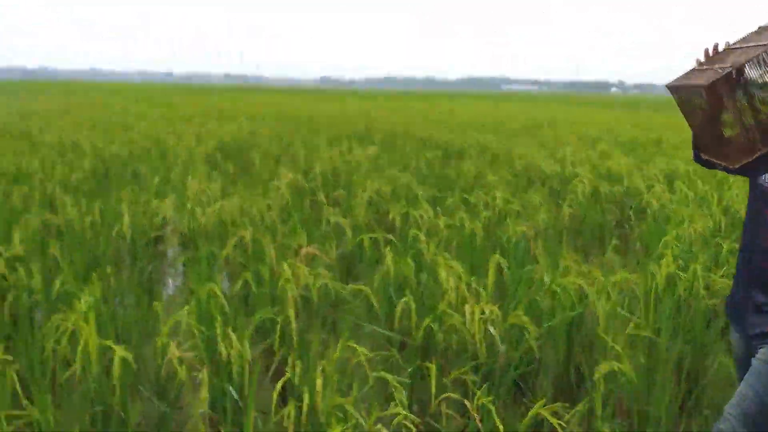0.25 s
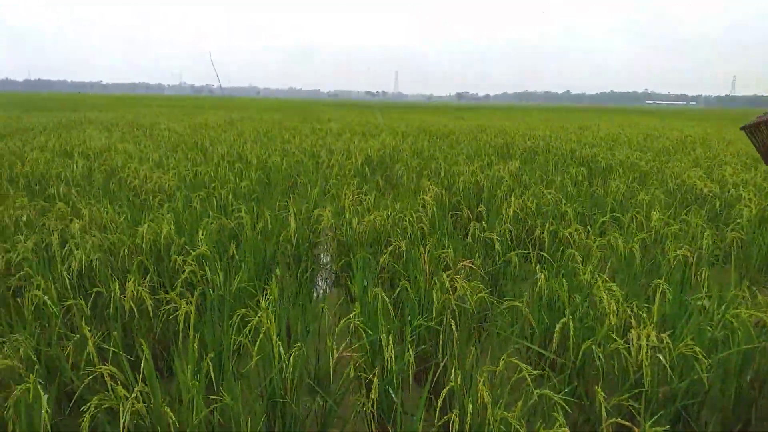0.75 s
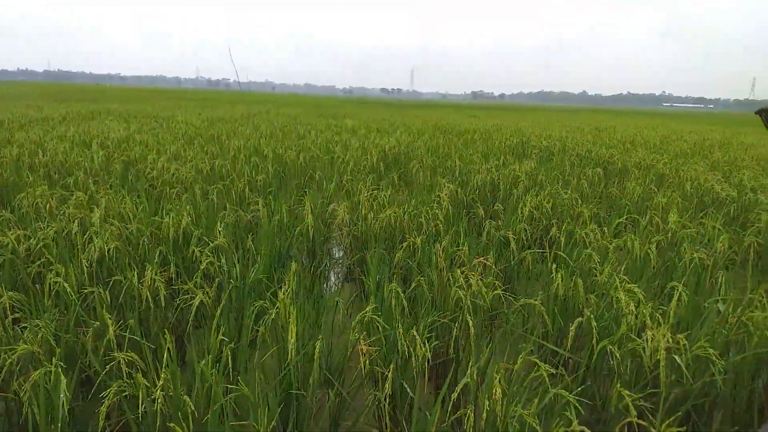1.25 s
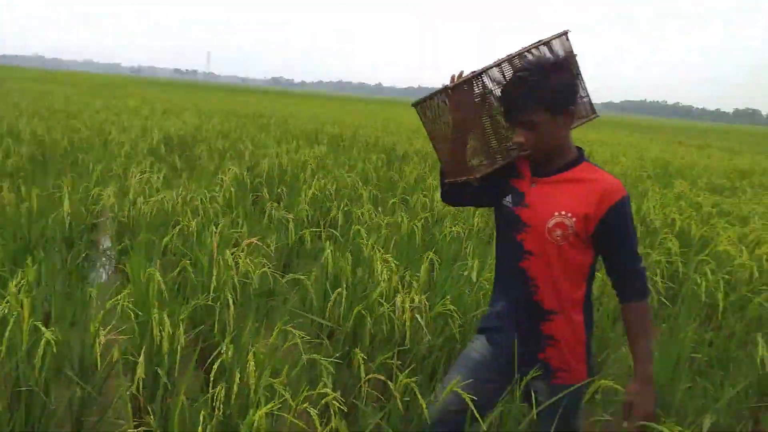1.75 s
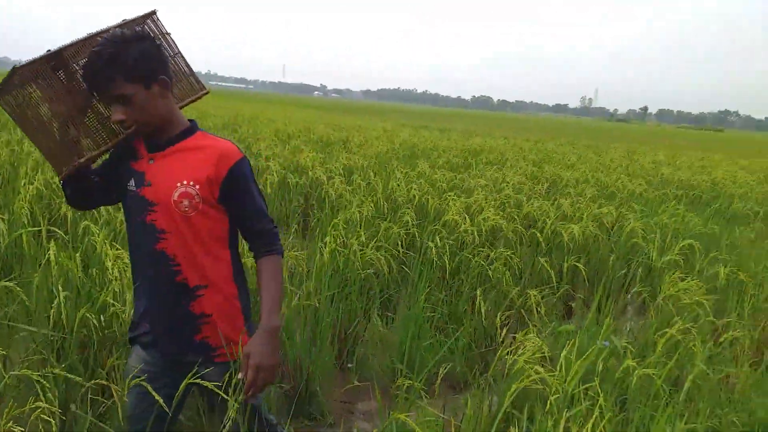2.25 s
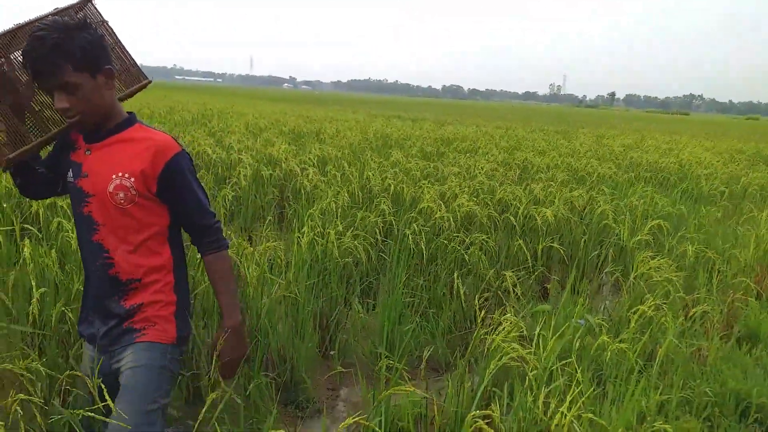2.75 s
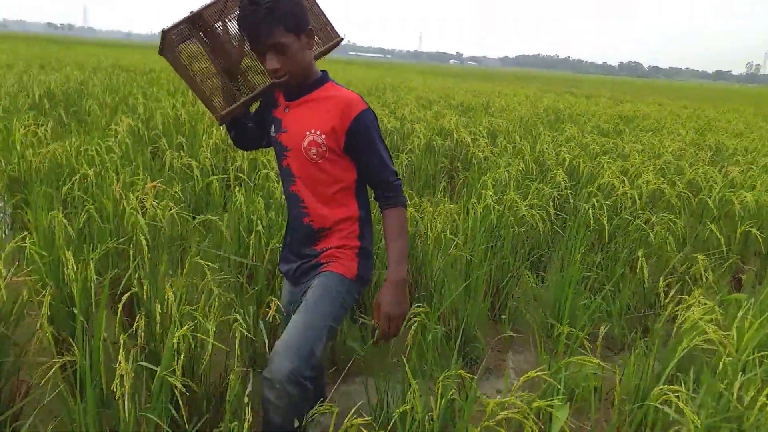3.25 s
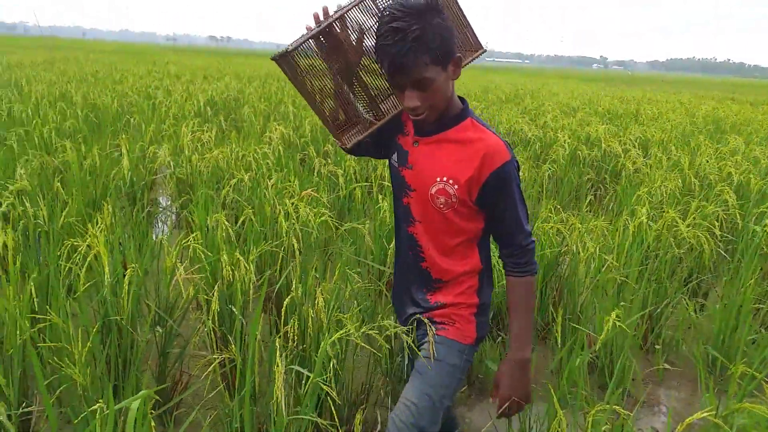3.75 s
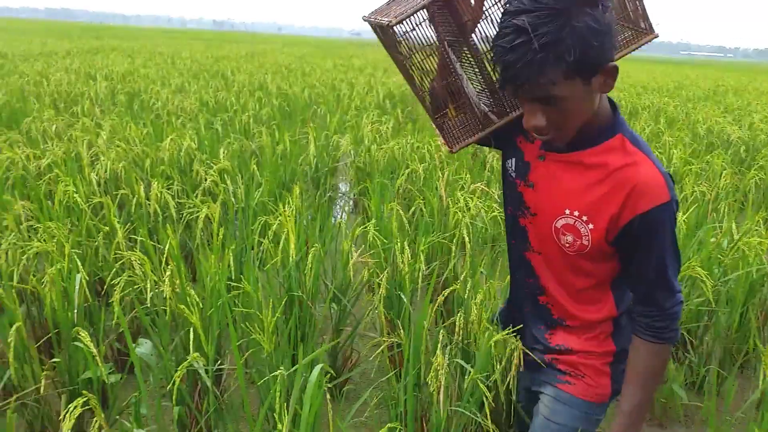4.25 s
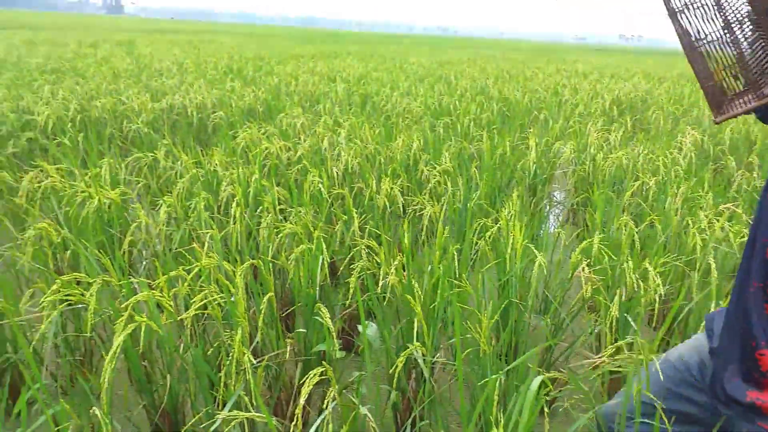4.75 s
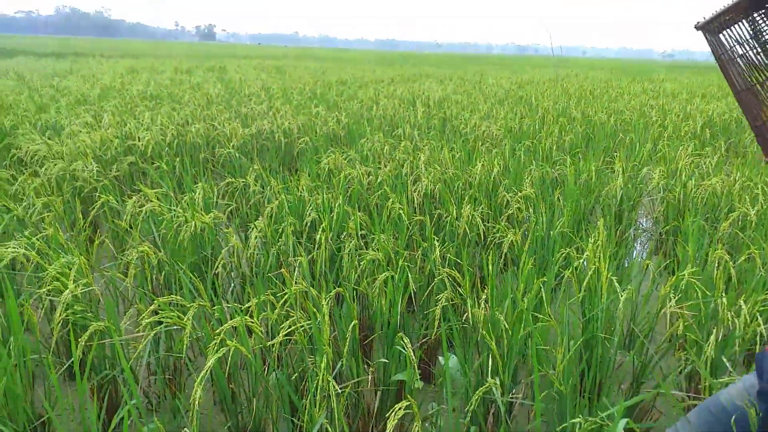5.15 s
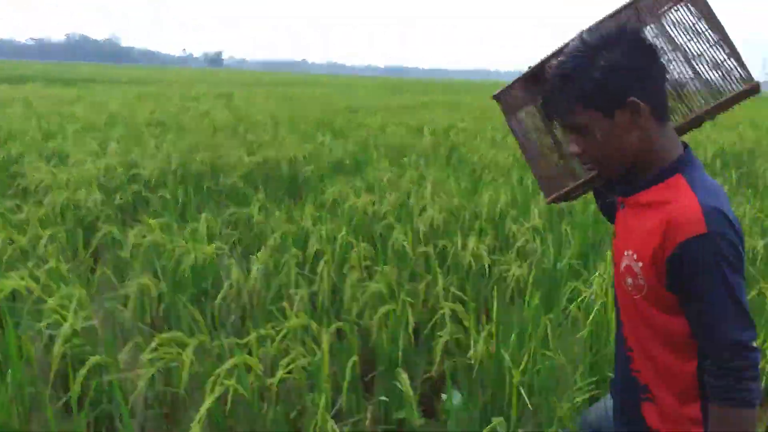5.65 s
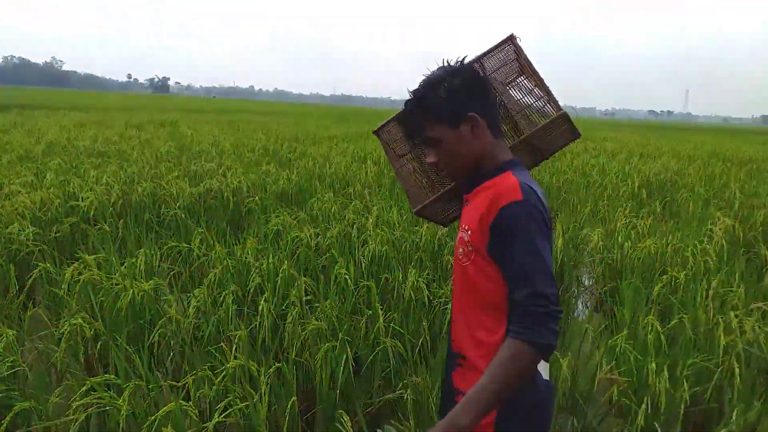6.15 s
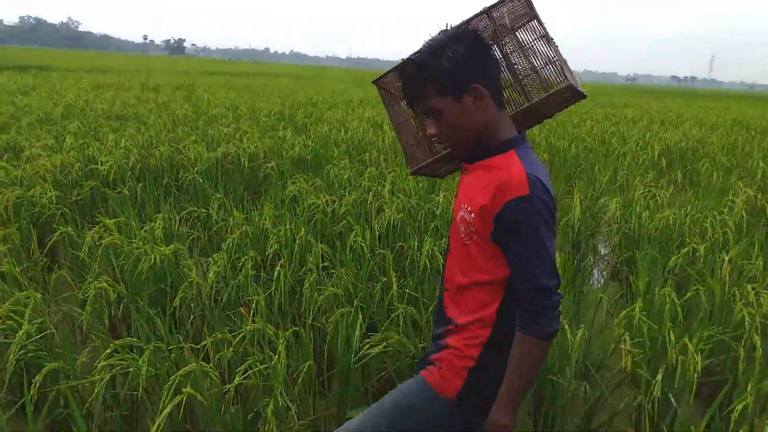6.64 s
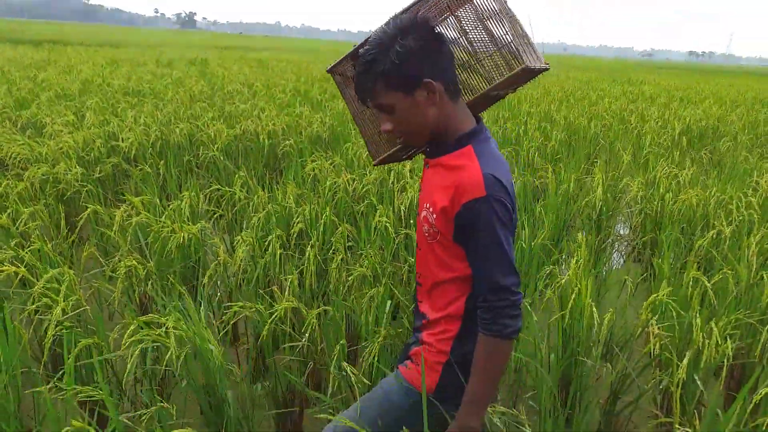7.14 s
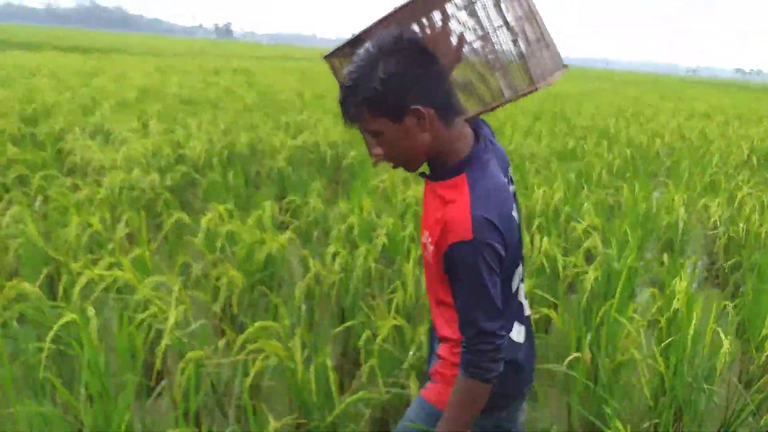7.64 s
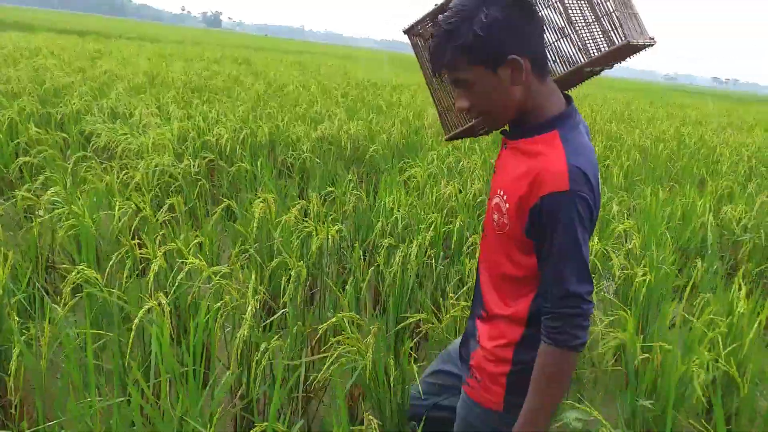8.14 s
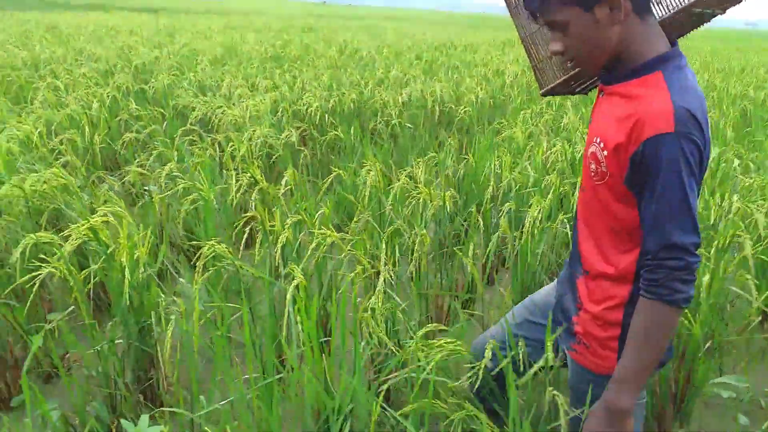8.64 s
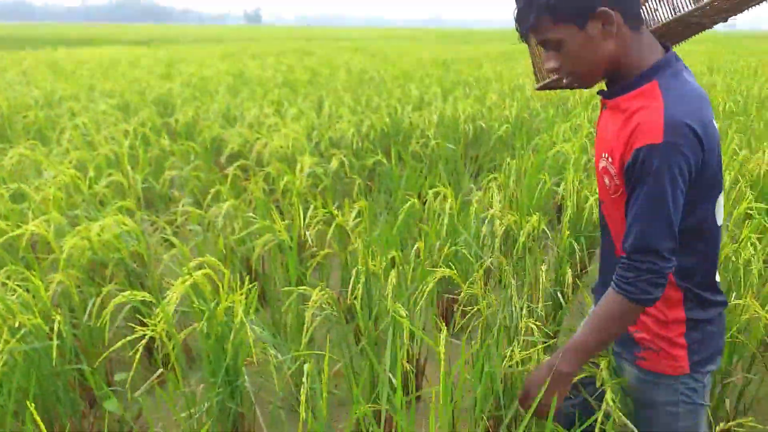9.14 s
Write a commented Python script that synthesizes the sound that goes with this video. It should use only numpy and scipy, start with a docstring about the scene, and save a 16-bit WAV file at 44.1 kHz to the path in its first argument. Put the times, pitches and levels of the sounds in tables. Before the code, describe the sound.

Outdoors in a flooded rice field, close microphone, no echo. From 0 to 0.6 s heavy low wind flutters and thumps on the microphone over soft sloshing and leaf hiss; gusts weaken until about 2 s, with sharp wet snaps at 0.9 to 1.7 s. A faint high cricket pulses quickly from 0.5 to 2.2 s among thin insect hiss. Around 2.5 to 3 s a stride gives rising squelches, small bubbles and clicks. It calms near 4 s. From 4.5 to 5.5 s come dense splashes, cracking slaps, plops and leaf flicks. Leaves swish brightly at 6 to 7 s, with low bubbles and a thump at 6.9 s. After a quieter rustle, bubbly plops and sharp slaps cluster at 8 to 8.3 s. Wind buffets strongly from 8.5 s, heaviest just after 9 s, with a last wet plop at the end. A far bird's brief falling whistle recurs faintly.

```python
"""Wading through a flooded rice field

Close by, each stride sloshes, throws drops and traps bubbles: shaped click trains and gliding, ringing tones.
The legs brush the leaves, a dense bright hiss of tiny catches with snaps and flicks.
Insects shrill all around in narrow bands of noise, and a far bird repeats a falling whistle.
Gusts of noise and low thumps of eddies buffet the microphone at the start and again near the end."""
import sys
import numpy as np
from scipy import signal
from scipy.fft import rfft, irfft, next_fast_len
from scipy.io import wavfile
from scipy.ndimage import uniform_filter1d

SR = 44100
rng = np.random.default_rng(int(sys.argv[2]) if len(sys.argv) > 2 else 0)


def materialize(psi):
    """Save the field psi as 16-bit PCM at rate SR to the path in sys.argv[1].

    A 1-D psi becomes a single channel; in a 2-D psi each row is a channel.
    """
    bounded = np.clip(np.atleast_2d(psi).T, -1, 1)
    quanta = np.round(bounded * 32767).astype(np.int16)
    wavfile.write(sys.argv[1], SR, quanta)


N = 414099
TIME = np.arange(N) / SR   # seconds

# Spectra, each scaled to a set level later. Each row: frequency in Hz, relative density in dB per Hz.
# Open air over the field.
FIELD_SPECTRUM = [(30, -8), (70, 12), (130, 14), (250, 8), (450, -8), (900, -10.5), (1700, -13.5),
                  (2400, -6.5), (3200, -8), (4300, -4.5), (6500, -19.5), (10000, -10.5), (16000, -37)]
# Wind at the microphone, before gust force tilts it.
WIND_SPECTRUM = [(25, -40), (40, -43), (65, 0), (110, 2), (200, -5), (300, -16), (500, -34.5), (900, -64),
                 (2000, -80)]
# Blades sliding over cloth.
LEAF_SPECTRUM = [(500, -50), (1000, -5), (1500, -29), (2100, -15.5), (3300, 1), (5200, 3), (6200, -2.5),
                 (8000, -1), (9300, -10.5), (10100, -6), (11200, 0), (13000, 2.5), (15500, 3.5)]
# Bent stalks crackling.
STALK_SPECTRUM = [(500, -13), (800, 9), (1150, -2), (1500, 5.5), (2100, -5), (3200, -11), (6000, -20)]
# Deep churn around the leg.
CHURN_SPECTRUM = [(150, -17), (260, -2.5), (350, 5), (480, -6.5), (700, -1), (1050, -2.5), (1500, -19),
                  (3000, -36)]
# Splatter of the slosh.
SLOSH_SPECTRUM = [(250, -36), (480, -8), (620, -4), (950, 2), (1250, -3.5), (1550, -2), (2200, -2),
                  (3200, -3), (7000, -14)]
# Fine flung spray.
SPRAY_SPECTRUM = [(1500, -4), (2600, -14.5), (3600, 5), (5200, 0.5), (7000, -1), (10000, -28), (16000, -38)]
# Falling drops.
PATTER_SPECTRUM = [(400, -25), (650, -2.5), (1000, 0.5), (1400, -5), (2000, -4), (2700, -3.5), (3700, 2),
                   (5500, -2.5), (8000, -15), (15000, -30)]

# Insect choruses all around. Each row: time in seconds, high chorus level in dB, low chorus level in dB.
INSECT_LEVELS = [(0, -62, -71), (1.3, -58.5, -57), (1.7, -53.5, -66), (2.2, -62, -63), (4.2, -60.5, -66),
                 (5, -68, -52), (7.7, -69, -53.5), (8.3, -51, -60.5), (9.39, -56, -49.5)]
# Far bird whistles. Each row: start in seconds, level in dB before the flutter, starting pitch in Hz.
BIRD_WHISTLES = [(.72, -46, 4700), (2.43, -50, 4000), (3.14, -57, 3700), (3.86, -56, 4600),
                 (5.51, -56, 3900), (6.79, -52, 4300), (7.09, -48, 4500), (8.75, -54, 3900)]
# Gusts on the microphone. Each row: start in seconds, hold in seconds, level in dB before lumps and trim.
WIND_GUSTS = [(0.0, 0.17, -16.5), (0.27, .15, -20), (0.54, 0.23, -19.5), (0.92, 0.02, -26),
              (1.05, 0.028, -29.5), (1.15, .04, -27), (1.28, 0.11, -26), (1.44, 0.072, -27),
              (1.58, 0.27, -30), (1.94, .09, -29), (2.26, 0.035, -38), (2.47, 0.19, -36),
              (2.91, 0.034, -40), (3.02, 0.028, -32), (3.13, 0.063, -35), (3.26, .76, -44),
              (4.15, 0.35, -50), (6.93, 0.043, -36.5), (7.68, .08, -32), (7.78, 0.45, -32),
              (8.39, 0.11, -28), (8.5, 0.064, -22), (8.76, 0.24, -23.5), (9.03, 0.32, -18.5)]
# Strong eddies hitting the microphone port. Each row: middle in seconds, level in dB before a trim,
# pitch at the middle in Hz.
PORT_EDDIES = [(0.074, -12, 166), (0.164, -11.5, 203), (0.278, -13, 167), (0.33, -15, 128),
               (0.377, -2, 200), (0.398, -6, 187), (0.41, -4, 176), (0.501, -9.5, 191), (0.534, -10, 201),
               (0.819, -9.5, 195), (1.298, -12, 184), (1.333, -12, 122), (1.382, -15.5, 145),
               (1.51, -14, 121), (1.804, -16.5, 102), (1.948, -17.5, 152), (2.625, -22, 99),
               (3.033, -22.5, 105), (3.137, -17.5, 134), (6.933, -8.5, 128), (7.784, -15.5, 168),
               (7.824, -11.5, 90), (7.934, -13, 190), (8.522, -6.5, 135), (8.565, -7.5, 174),
               (8.753, -14.5, 137), (8.779, -13, 118), (8.857, -8.5, 131), (8.954, -9.5, 141),
               (9.01, -17, 260), (9.039, -3.5, 149), (9.062, -5.5, 192), (9.096, -6, 260), (9.114, -5, 205),
               (9.17, -10, 161), (9.227, -6.5, 172), (9.288, -15, 173)]
# A leg sweeps through a clump of leaves. Each row: start in seconds, hold in seconds, level in dB before trims.
LEAF_BRUSHES = [(0.0, 0.52, -52.5), (2.43, 0.062, -47), (2.94, 0.092, -48), (3.3, 0.77, -53),
                (4.36, 0.3, -43.5), (4.8, 0.15, -48), (5.98, 0.22, -40.5), (6.39, 0.33, -37.5),
                (6.88, 0.097, -42.5), (7.3, .7, -46), (8.3, 0.39, -41), (8.8, 0.29, -45), (9.22, .17, -44)]
# Dry blades flicking free. Each row: start in seconds, peak in dB.
BLADE_FLICKS = [(2.786, -29), (4.5875, -29), (4.6344, -29), (4.9781, -27), (5.043, -24), (5.2939, -32),
                (6.8748, -25), (7.5383, -35)]
# Sharp slaps of water and snapping stalks. Each row: start in seconds, level in dB before a trim,
# crack centre in Hz, low plash in dB relative to the crack.
WATER_SLAPS = [(0.175, -27, 3870, -6), (0.787, -35, 3960, -12), (0.8808, -19, 3680, -31),
               (0.9947, -26, 3720, -6), (1.1064, -29, 6140, -21), (1.3743, -26.5, 4940, -17),
               (1.556, -24, 3170, -20), (1.6659, -27, 1830, -19), (2.5855, -31, 3620, -1),
               (2.6585, -23, 3380, -15), (2.8429, -33, 5610, -7), (2.9878, -25, 4200, -16),
               (3.469, -27.5, 2100, -15), (4.5411, -22.5, 3300, -7), (4.6352, -21.5, 6580, -24),
               (4.6577, -24, 1770, -6), (4.6815, -18.5, 3460, -13), (4.702, -17.5, 3360, -9),
               (4.8098, -22, 3660, -16), (5.047, -18, 5210, -6), (5.087, -19, 2700, 3),
               (5.141, -18.5, 3950, -19), (5.217, -18.5, 3800, -16), (5.249, -23, 3640, -22),
               (5.365, -24, 3500, -19), (5.4024, -17, 3100, 2), (5.44, -25.5, 4230, -2),
               (5.753, -25, 4870, -23), (6.3738, -22, 4550, -15), (6.8766, -28, 5320, -2),
               (6.906, -20.5, 4230, -24), (7.933, -23, 4090, -10), (7.9714, -23, 3840, -4),
               (8.0207, -21, 1500, 10), (8.0684, -29, 1670, -6), (8.1095, -22, 3670, -20),
               (8.1868, -24, 2240, -12), (8.2, -20, 2600, -8), (8.3263, -21, 2860, -12),
               (8.6276, -21.5, 3700, -18), (9.103, -22.5, 3470, -9.5), (9.358, -29.5, 2280, -4)]
# Air pockets that open or close around a foot. Each row: start in seconds, length in seconds,
# start pitch in Hz, end pitch in Hz, level in dB before a trim.
FOOT_SQUELCHES = [(1.75, 0.071, 573, 900, -36), (2.531, 0.037, 937, 2290, -29),
                  (2.61, 0.032, 688, 1610, -29.5), (2.665, 0.012, 1410, 2400, -24.5),
                  (2.677, 0.0255, 880, 1280, -36), (2.712, 0.019, 2500, 1460, -31),
                  (2.729, 0.035, 1010, 880, -33), (2.798, 0.047, 794, 906, -33.5),
                  (4.524, 0.0485, 642, 910, -31), (4.993, 0.089, 900, 1050, -51),
                  (5.281, 0.036, 960, 510, -29.5), (6.033, 0.034, 1280, 843, -32),
                  (8.563, 0.033, 1290, 690, -30)]
# Single large bubbles. Each row: start in seconds, level in dB, starting pitch in Hz, 60 dB decay in seconds.
LARGE_BUBBLES = [(0.787, -30.5, 3700, 0.02), (1.471, -29.5, 1900, .019), (1.515, -25, 543, 0.025),
                 (1.555, -21, 3180, 0.018), (1.639, -30.5, 1950, .025), (1.666, -28, 1820, 0.013),
                 (1.746, -33, 1750, .027), (2.586, -32.5, 597, 0.064), (2.586, -26, 3650, .013),
                 (2.661, -24, 3700, .009), (2.715, -28.5, 2210, 0.018), (2.786, -27, 800, .042),
                 (2.82, -28, 3850, .02), (3.39, -38.5, 1780, .027), (3.437, -29, 990, 0.016),
                 (4.541, -29, 3200, 0.038), (4.57, -32, 1790, 0.066), (4.653, -27, 4100, 0.038),
                 (4.658, -27, 1770, .033), (4.658, -18, 1010, .017), (4.684, -22, 900, 0.021),
                 (5.156, -31, 1010, .03), (5.161, -30.5, 550, 0.032), (5.251, -32, 2290, .031),
                 (5.308, -30, 443, 0.027), (5.69, -29, 290, 0.062), (5.757, -37, 285, 0.15),
                 (6.06, -29, 900, .03), (6.071, -36, 260, .19), (6.125, -36, 585, 0.11),
                 (6.869, -27, 650, 0.019), (7.993, -22.5, 520, 0.055), (8.021, -28, 1510, .017),
                 (8.069, -18.5, 900, 0.017), (8.087, -24, 1610, 0.017), (8.11, -19, 3700, .014),
                 (8.187, -19.5, 2200, 0.03), (8.206, -24, 810, 0.029), (8.318, -30, 1180, 0.033),
                 (8.638, -22.5, 1370, 0.03), (9.055, -29, 2440, .024), (9.374, -23.5, 2390, .012)]
# A leg pushes through the water. Each row: start in seconds, hold in seconds, slosh level in dB,
# spray level in dB, deep churn level in dB, all before trims.
LEG_STRIDES = [(0.0, .2, -47.5, -52, -72), (0.818, 0.44, -49, -45, -80), (1.378, .4, -45, -50.5, -66),
               (2.562, 0.26, -43, -48, -59), (2.897, 0.39, -50.5, -46.5, -75),
               (3.39, 0.16, -48.5, -60, -62), (4.458, 0.12, -46.5, -49, -53),
               (4.644, 0.037, -40.5, -36, -52), (4.814, 0.21, -44.5, -44.5, -73),
               (4.96, 0.11, -42, -39.5, -47.5), (5.156, 0.19, -43, -41.5, -46),
               (5.516, 0.39, -55, -42.5, -60), (6.03, .03, -41.5, -40.5, -51),
               (6.14, 0.63, -46.5, -43.5, -66), (6.818, 0.13, -44.5, -44.5, -72),
               (7.864, 0.051, -47, -42, -68), (8.062, 0.032, -34.5, -41, -46),
               (8.187, 0.038, -38, -36.5, -65), (8.343, 0.33, -42, -45, -56),
               (8.705, 0.26, -51.5, -52, -72), (9.337, .06, -36, -41, -66)]

# One near cricket chirps at a steady pace, swelling to its loudest and fading again.
CRICKET_START_S, CHIRP_EVERY_S, CHIRP_HALF_S = .51, .1175, .044
CRICKET_DB, CRICKET_LOUDEST_S, CRICKET_FADE_DB_PER_S = -57, 1.5, 9
GUST_RISE_S, GUST_FALL_S = 0.091, 0.13   # a gust comes, and goes, by 20 dB in these times
BREEZE_DB = -56.5   # between gusts, before lumps and trim
RASP_DB, RASP_DB_PER_OCTAVE = -30.5, 17.5   # rasp of a 160 Hz eddy, relative to its row; faster ones rasp more
BEND_S, SPRING_BACK_S = 0.43, 0.77   # the leaves swell, and fade, by 20 dB in these times
RUSTLE_DB = -55   # leaves that never stop touching, before trims
PUSH_S, SETTLE_S = 0.15, 0.24   # the water rises, and settles again, by 20 dB in these times
TRICKLE_DB, DRIP_DB, CHURN_REST_DB = -57.5, -50.5, -65.5   # the wake between strides, before trims
CUTOFF_HZ = 15750   # top of the microphone's range


def from_db(db):
    """Decibels to gain."""
    return 10 ** (np.asarray(db) / 20)


def rms_one(x):
    """Scale to unit rms."""
    return x / np.sqrt(np.mean(x ** 2) + 1e-20)


def in_time(rows):
    """Each column of a curve table, sample by sample."""
    s, *columns = np.transpose(rows)
    return [np.interp(TIME, s, c) for c in columns]


def at_hz(points, hz):
    """Read a spectrum on a log-frequency axis."""
    table_hz, table_db = np.array(points).T
    return np.interp(np.log(hz + 1e-3), np.log(table_hz), table_db)


def drift(rate):
    """Smooth chance of spread 1, changing about rate times a second."""
    r = np.exp(-40 * np.pi * rate / SR)   # computed at every twentieth sample
    noise = rng.standard_normal(N // 20 + 2002)
    slow = signal.lfilter([1], [1, -2 * r, r * r], noise)[2000:]
    return np.interp(np.arange(N) / 20, np.arange(len(slow)), rms_one(slow))


def coloured(x, spectrum):
    """Give a noise or a click train a spectrum; rms 1."""
    size = next_fast_len(N)
    hz = np.arange(size // 2 + 1) * SR / size
    shaped = irfft(rfft(x, size) * from_db(at_hz(spectrum, hz)), size)
    return rms_one(shaped[:N])


def band_pass(x, low_hz, high_hz):
    """Keep the band between two frequencies."""
    return signal.sosfilt(signal.butter(2, [low_hz, high_hz], "band", fs=SR, output="sos"), x)


def low_pass(x, hz):
    """Soften everything above a frequency."""
    return signal.sosfilt(signal.butter(2, hz, fs=SR, output="sos"), x)


def resonance(x, hz, width_hz):
    """Two-pole resonance, gain about 1 on top."""
    r = np.exp(-np.pi * width_hz / SR)
    feedback = [1, -2 * r * np.cos(2 * np.pi * hz / SR), r * r]
    return signal.lfilter(np.array([1, 0, -1]) * (1 - r * r) / 2, feedback, x)


def grains(per_s, spread_db):
    """Random clicks of either sign, most small and a few large."""
    chance, out = rng.random(N), np.zeros(N)
    size, sign = rng.exponential(1, N), rng.random(N) - .5
    at = chance < per_s / SR
    out[at] = from_db(spread_db * np.minimum(size[at], 4)) * np.sign(sign[at])
    return out


def add(out, s, sound):
    """Mix a short sound in at time s."""
    start = int(np.clip(round(s * SR), 0, N))
    out[start:start + len(sound)] += sound[:N - start]


def swells(rows, rise_s, fall_s, rest_db):
    """Rise, hold and fall for each row (s, hold s, dB), over a resting level; the joint level in dB."""
    t, power = TIME[::50], from_db(rest_db) ** 2
    for s, hold, db in rows:
        outside = np.maximum(s - t, 0) / rise_s + np.maximum(t - s - hold, 0) / fall_s
        power = power + from_db(db - 20 * np.minimum(outside, 10)) ** 2
    return np.interp(TIME, t, 10 * np.log10(power))


def field():
    """Open air: a low far rumble and the soft hiss of the crop."""
    return from_db(-46.5) * coloured(rng.standard_normal(N), FIELD_SPECTRUM)


def shrill(low_hz, high_hz):
    """Insect voices merged into noise in a narrow, steep band; rms 1."""
    return rms_one(band_pass(rng.standard_normal(N), low_hz, high_hz))


def cricket_chirps(count):
    """Loudness of an evenly paced run of short, round chirps."""
    times = CRICKET_START_S + CHIRP_EVERY_S * np.arange(count)
    levels_db = CRICKET_DB - CRICKET_FADE_DB_PER_S * np.abs(times - CRICKET_LOUDEST_S)
    loudness = np.zeros(N)
    for s, db in zip(times, levels_db):
        loudness += from_db(db) * np.exp(-((TIME - s) / CHIRP_HALF_S) ** 4)
    return loudness


def insects():
    """Far choruses merge into narrow bands of shrill hiss; one cricket chirps above them."""
    high_db, low_db = in_time(INSECT_LEVELS)
    high = from_db(high_db) * shrill(8850, 9400)
    low = from_db(low_db) * shrill(8050, 8900)
    cricket = cricket_chirps(count=15) * shrill(9780, 10100)
    return high + low + cricket


def bird(end_hz, glide_s, length_s):
    """A thin, wavering whistle that drops quickly, then levels out and fades; distance breaks it up."""
    out, t = np.zeros(N), np.arange(int(length_s * SR)) / SR
    waver = 1 + .025 * drift(150)
    fade = np.minimum(t / 0.017, 1) * np.sqrt(1 - t / length_s)
    for s, db, start_hz in BIRD_WHISTLES:
        glide = end_hz + (start_hz - end_hz) * np.exp(-t / glide_s)
        pitch = glide * waver[int(s * SR):][:len(t)]
        call = from_db(db) * np.sin(2 * np.pi * np.cumsum(pitch) / SR) * fade
        add(out, s, call)
        add(out, s + 0.0096, .5 * call)   # a weaker path off the field
    return out * from_db(3.2 * drift(130))


def wind():
    """Lumpy turbulence at the port; a faster gust is louder and reaches higher, in short bursts."""
    level_db = swells(WIND_GUSTS, GUST_RISE_S, GUST_FALL_S, BREEZE_DB) + 2.0 * drift(10.3)
    force = np.clip((level_db + 45.5) / 24, 0, 1.2)
    lumps = np.tanh(drift(31.5))
    tilt_db = 19.4 * (force - 1) + 1.6 * lumps   # per octave above 110 Hz
    edges = 25 * 2 ** (np.arange(13) / 2)   # half-octave bands, Hz
    white = rng.standard_normal((2, N))   # neighbouring bands take different noises
    out, power = np.zeros(N), 0
    for k, (low, high) in enumerate(zip(edges, edges[1:])):
        hz = np.sqrt(low * high)
        band = band_pass(white[k % 2], low, high)
        octaves = np.clip(np.log2(hz / 110), -1.2, 2)
        gain = from_db(at_hz(WIND_SPECTRUM, hz) + tilt_db * octaves)
        out += gain * band
        power = power + gain ** 2 * np.mean(band ** 2)
    out = low_pass(out / np.sqrt(power), 620)
    # even out the slow level, so that the gust alone sets it
    steady = out / np.sqrt(uniform_filter1d(out ** 2, size=2200) + 1e-9)
    slack = np.clip(1 - 3 * force, 0, 1)
    return steady * from_db(level_db - 2.5 + 3.0 * lumps - 2 * slack)


def eddies():
    """An eddy sweeps over the port: a thump of about two swings that slow down, with a brief fine rasp."""
    out, t = np.zeros(N), np.arange(-SR // 40, SR // 40) / SR
    fine = band_pass(rng.standard_normal((len(PORT_EDDIES), len(t))), 330, 680)
    fine = low_pass(fine, 900)
    slowing = 0.57   # pitch falls by this exponent per cycle
    for (s, db, hz), turn, rasp in zip(PORT_EDDIES, rng.random(len(PORT_EDDIES)), fine):
        cycles = hz * t
        phase = (1 - np.exp(-slowing * cycles)) / slowing + turn
        thump = np.exp(-(cycles / 0.88) ** 2) * np.sin(2 * np.pi * phase)
        rasp = rasp * np.exp(-(t / 0.0079) ** 2)
        rasp_db = db + RASP_DB + RASP_DB_PER_OCTAVE * np.log2(hz / 160)
        add(out, s + t[0], from_db(db - 4.5) * thump + from_db(rasp_db) * rasp / np.abs(rasp).max())
    return out


def leaves():
    """Rough blades slide over cloth: a dense, bright hiss of tiny catches, and a tick when one flicks free."""
    level_db = swells(LEAF_BRUSHES, BEND_S, SPRING_BACK_S, RUSTLE_DB)
    catches = grains(per_s=12000, spread_db=2.5) + grains(per_s=61, spread_db=5.5)
    out = from_db(level_db + 5.0 + 1.33 * drift(16)) * coloured(catches, LEAF_SPECTRUM)
    crackle = coloured(grains(per_s=220, spread_db=3.0), STALK_SPECTRUM)   # bent stalks sound lower
    out += from_db(level_db - 16.5) * crackle
    t = np.arange(SR // 100) / SR
    for s, db in BLADE_FLICKS:
        noise = rng.standard_normal(len(t))
        tick = resonance(noise * np.exp(-t / 0.0026), hz=13000, width_hz=8200)
        add(out, s, from_db(db) * tick / np.abs(tick).max())
    return out


def slaps():
    """A contact of a few milliseconds, coloured by the size of drop or stalk, over the surface's low plash."""
    out, t = np.zeros(N), np.arange(SR // 25) / SR
    contact = np.exp(-t / 0.0025) + from_db(-15) * np.exp(-t / 0.013)
    for s, db, hz, plash_db in WATER_SLAPS:
        burst = np.tanh(2 * rng.standard_normal(len(t))) * contact
        crack = resonance(burst, hz, width_hz=860)
        plash = from_db(plash_db) * resonance(burst, hz=1040, width_hz=600)
        slap = band_pass(crack + plash, 450, 6500)
        add(out, s, from_db(db - 3.0) * slap / np.abs(slap).max())
    return out


def squelches():
    """A cavity changes size quickly while splashing water excites it, so its rough, wet note glides."""
    out = np.zeros(N)
    excitation = .7 + .5 * (drift(190) + 1j * drift(190))   # roughens both loudness and phase
    for s, length, start_hz, end_hz, db in FOOT_SQUELCHES:
        progress = np.linspace(0, 1, int(length * SR))
        pitch = start_hz * (end_hz / start_hz) ** progress
        carrier = np.exp(2j * np.pi * np.cumsum(pitch) / SR)
        note = excitation[int(s * SR):][:len(pitch)] * carrier
        envelope = np.sqrt(np.abs(np.sin(np.pi * progress)))
        add(out, s, from_db(db - 9) * note.real * envelope)
    return out


def bubble(hz, t60, rise):
    """Trapped air rings and climbs in pitch as it nears the surface."""
    t = np.arange(int(t60 * SR) + 2) / SR
    cycles = hz * (t + rise * t * t / (2 * t60))
    onset = 1 - np.exp(-2 * cycles)
    return np.sin(2 * np.pi * cycles) * from_db(-60 * t / t60) * onset


def plops():
    """The large bubbles that stand out of the strides."""
    out = np.zeros(N)
    for s, db, hz, t60 in LARGE_BUBBLES:
        add(out, s, from_db(db) * bubble(hz, t60, rise=0.25 * rng.random()))
    return out


def bubble_cloud(low_hz, high_hz, ring_cycles, spread_db, rise, count):
    """Many small bubbles of random pitch, size and moment; rms 1."""
    out = np.zeros(N)
    for when, pitch, size, damping, climb in rng.random((count, 5)):
        hz = low_hz * (high_hz / low_hz) ** pitch
        gain = from_db(spread_db * size ** 2) * np.sqrt(hz)
        t60 = ring_cycles * (.5 + damping) / hz
        add(out, when * N / SR, gain * bubble(hz, t60, rise * climb))
    return rms_one(out)


def patter(per_s, spread_db, contact_s):
    """Thrown drops land one by one, each a short wet tick; rms 1."""
    t = np.arange(SR // 80) / SR
    out, size = np.zeros(N), grains(per_s, spread_db)
    noise = rng.standard_normal(N + len(t))
    for at in np.flatnonzero(size):
        add(out, at / SR, size[at] * noise[at:at + len(t)] * np.exp(-t / contact_s))
    return coloured(out, PATTER_SPECTRUM)


def wading():
    """A leg churns the water into splatter and bubbles, and flings a finer spray of drops."""
    s, hold, slosh_peak, spray_peak, churn_peak = np.transpose(LEG_STRIDES)
    slosh_db = swells(zip(s, hold, slosh_peak), PUSH_S, SETTLE_S, TRICKLE_DB)
    spray_db = swells(zip(s, hold, spray_peak), PUSH_S, SETTLE_S, DRIP_DB)
    churn_db = swells(zip(s, hold, churn_peak), PUSH_S, SETTLE_S, CHURN_REST_DB)
    effort = np.clip((slosh_db + 56) / 12, 0, 1)   # a slow leg barely breaks the surface

    churn = coloured(grains(per_s=1100, spread_db=2.5), CHURN_SPECTRUM)
    deep = from_db(churn_db + 2 * drift(34)) * churn

    ticks = from_db(-6.5) * patter(per_s=110, spread_db=2.5, contact_s=0.002)
    splatter = from_db(-7) * coloured(grains(per_s=3800, spread_db=0.5), SLOSH_SPECTRUM)
    gurgle = from_db(-6.0) * bubble_cloud(low_hz=506, high_hz=2224, ring_cycles=44,
                                          spread_db=17.5, rise=0.29, count=3000)
    slosh = from_db(slosh_db + 2 * effort * drift(27)) * (splatter + gurgle + ticks)

    mist = from_db(-7.0) * coloured(grains(per_s=5000, spread_db=6.5), SPRAY_SPECTRUM)
    drops = from_db(-7) * bubble_cloud(low_hz=2792, high_hz=6190, ring_cycles=79,
                                       spread_db=11.5, rise=0.29, count=2200)
    spray = from_db(spray_db + 2 * effort * drift(33)) * (mist + drops)
    return deep + (slosh + spray) * from_db(-5 * (1 - effort))


def scene():
    """All sources at one microphone, with no walls to echo."""
    wildlife = insects() + bird(end_hz=2180, glide_s=.06, length_s=0.14)
    wader = leaves() + slaps() + squelches() + plops() + wading()
    return (field() + wildlife + wind() + eddies() + wader)[None]


def record(dry):
    """The microphone loses the deepest bass; the top is cut steeply."""
    thin = signal.sosfilt(signal.butter(3, 48, "high", fs=SR, output="sos"), dry)
    return signal.sosfilt(signal.ellip(12, .2, 90, CUTOFF_HZ, fs=SR, output="sos"), thin)


dry = scene()
out = record(dry)
materialize(out)
```